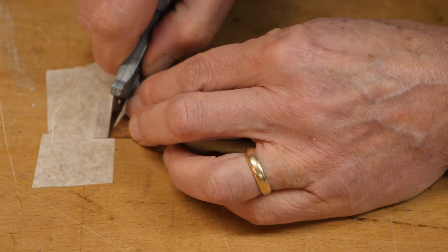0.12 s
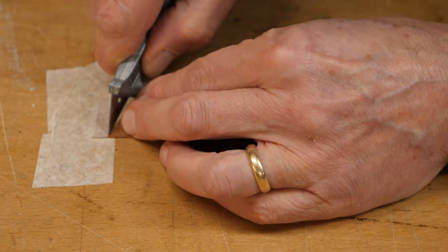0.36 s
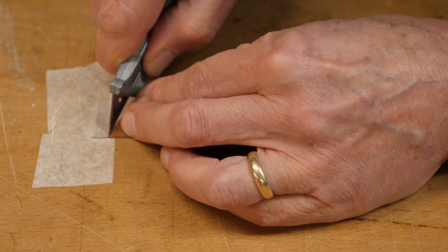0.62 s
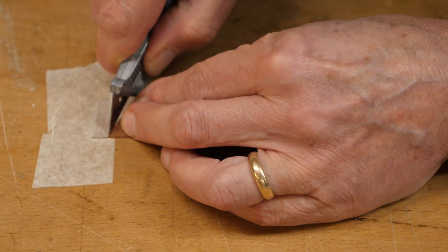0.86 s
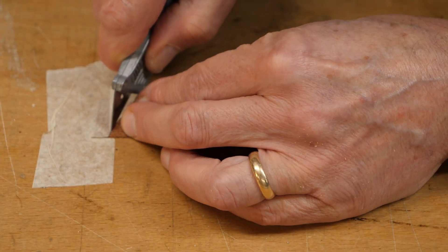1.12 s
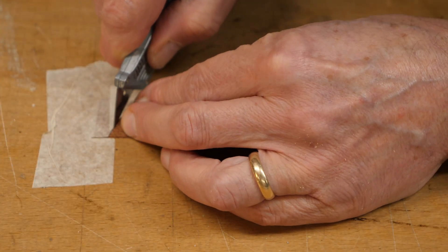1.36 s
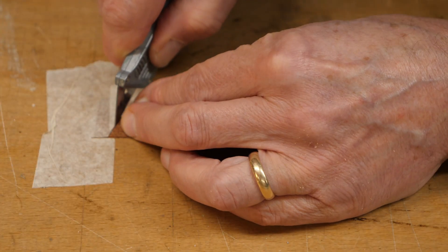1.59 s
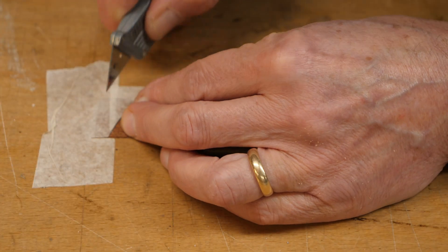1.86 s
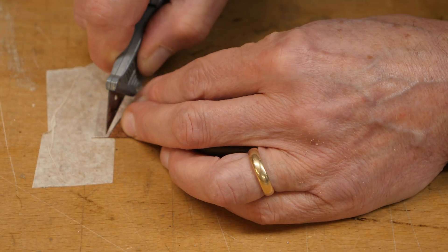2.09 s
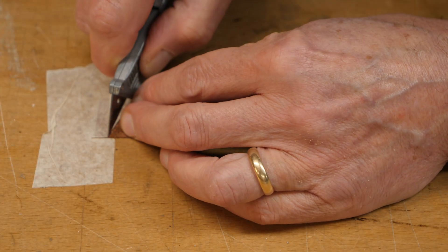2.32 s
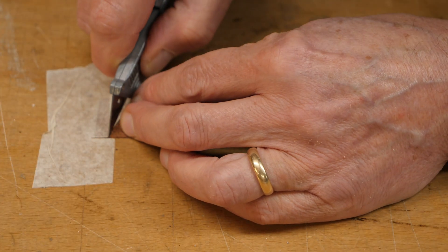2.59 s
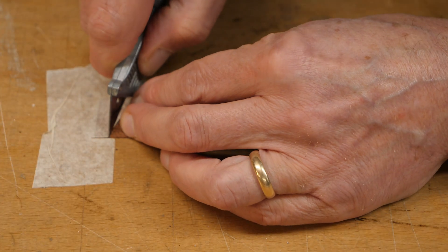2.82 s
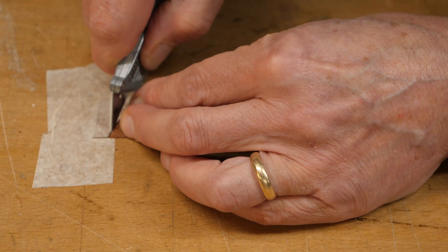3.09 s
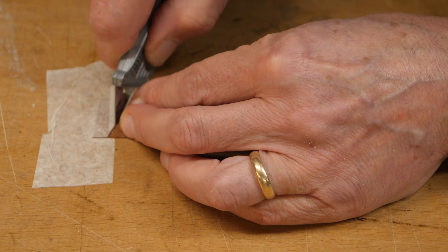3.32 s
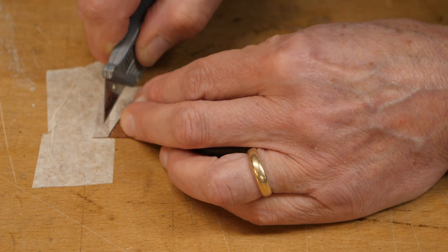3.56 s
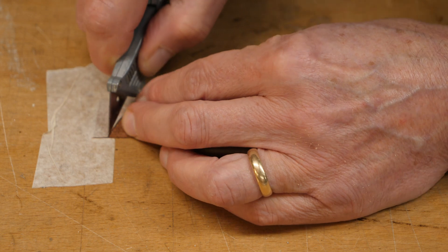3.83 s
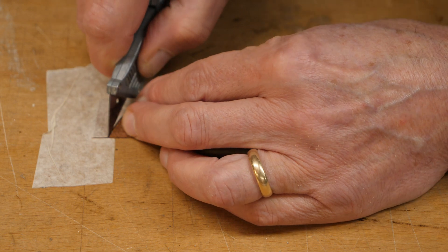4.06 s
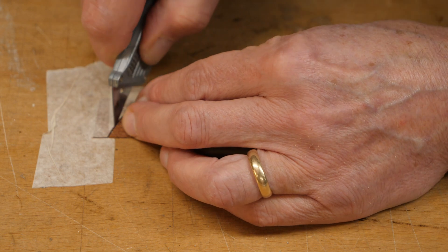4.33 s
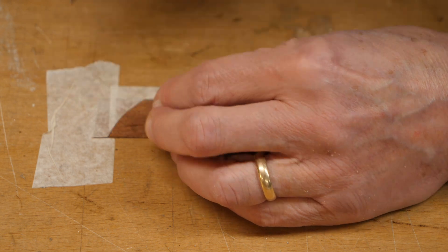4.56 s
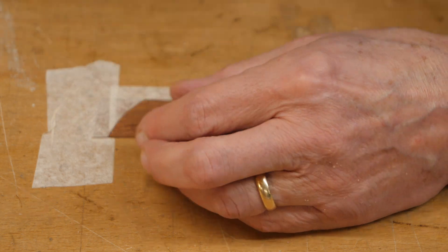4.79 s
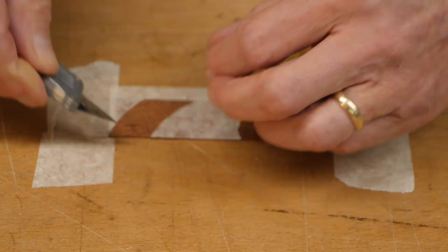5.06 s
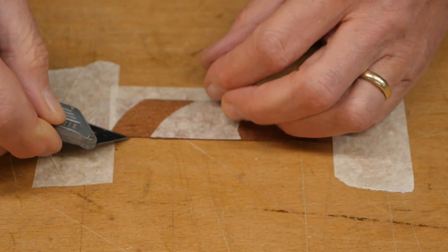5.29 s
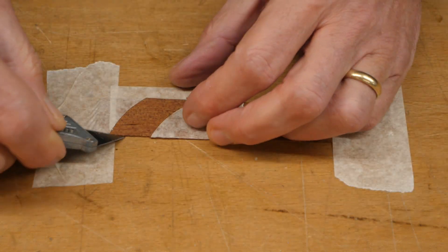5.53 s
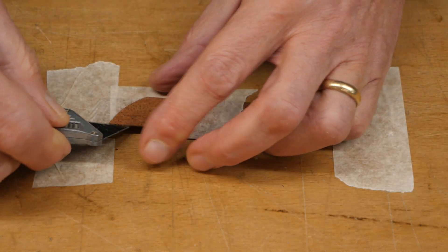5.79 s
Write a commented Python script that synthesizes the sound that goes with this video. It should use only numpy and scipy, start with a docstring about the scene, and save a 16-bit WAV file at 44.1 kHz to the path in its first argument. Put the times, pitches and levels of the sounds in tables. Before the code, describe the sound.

Close up in a small quiet workshop, a knife works on thin veneer lying on a wooden bench. Faint taps come first, then a sharp crunching crack, a brief scrape and a papery slap. More cracks follow around three seconds, with a hard knock after four. The hand then shifts with soft thumps and crisp ticks, and skin and blade rub softly. Short room reflections, low rumble and light hiss; near-centred stereo microphone.

```python
"""A small quiet workshop: a craft knife works on thin veneer taped to a wooden bench, close by.
Fibres snap as clusters of tiny cracks; blows ring the natural tones of the veneer and the bench top.
Blade and skin scrape over the wood as clumpy, coloured noise.
The room answers every contact; air rumble and microphone hiss lie underneath."""
import sys
import numpy as np
from scipy import signal
from scipy.fft import rfft, irfft, next_fast_len
from scipy.io import wavfile
from scipy.ndimage import map_coordinates

SR = 44100
rng = np.random.default_rng(int(sys.argv[2]) if len(sys.argv) > 2 else 0)


def to_wav(s):
    """Save 16-bit WAV."""
    ch = np.atleast_2d(s).T  # columns
    pcm = np.round(np.clip(ch, -1, 1) * 32767)  # PCM
    wavfile.write(sys.argv[1], SR, pcm.astype(np.int16))


def boost_factor(decibels):
    """Convert a level in decibels to a linear amplitude factor."""
    exponent = np.asarray(decibels, float) / 20
    return 10 ** exponent


N = 260631  # length in samples
SILENT_DB = -120


def unit(x):
    """Scales a sound to rms 1."""
    return x / np.sqrt(np.mean(x ** 2) + 1e-20)


def along(points, hz):
    """Reads values between (f/Hz, value) points on a logarithmic pitch axis."""
    f, value = np.transpose(points)
    return np.interp(np.log(hz + 1), np.log(f + 1), value)


def coloured(x, spectrum):
    """Makes each frequency louder or softer, following (f/Hz, level/dB) points."""
    size = next_fast_len(len(x) + 2048)
    gain = boost_factor(along(spectrum, np.fft.rfftfreq(size, 1 / SR)))
    return irfft(rfft(x, size) * gain, size)[:len(x)]


def noise(count, colour):
    """Coloured random noise of rms 1."""
    return unit(coloured(rng.standard_normal(count), colour))


def wobble(rate):
    """A smooth random curve through `rate` random points a second."""
    points = rng.standard_normal(int(N * rate / SR) + 4)
    return map_coordinates(points, [np.arange(N) * rate / SR])


def add(total, s, sound):
    """Mixes a sound in at time s."""
    part = total[round(s * SR):][:len(sound)]
    part += sound[:len(part)]


def causal(spectrum, size):
    """A pulse of the given colour with its energy as early as possible (minimum phase); peak 1."""
    log_gain = np.log(boost_factor(along(spectrum, np.fft.rfftfreq(size, 1 / SR))))
    cepstrum = irfft(log_gain, size)
    cepstrum[1:size // 2] *= 2
    cepstrum[size // 2 + 1:] = 0
    pulse = irfft(np.exp(rfft(cepstrum)), size)
    return pulse / np.abs(pulse).max()


# the blade breaks through the fibres into the bench:
# t/s, snap level/dB, fizz level/dB, veneer level/dB, bench knock level/dB
CUT_BLOWS = [(1.3599, -7, -18.5, -26, -21), (2.7585, -17, -75, -22.5, -18), (3.101, -9, -16, -19.5, -16),
             (3.4103, -18, -27, -32.5, -31), (4.2473, -16, -33.5, -24, -14.5)]


def cuts():
    """Blows of the breaking blade: all layers, with a thump tied to the knock."""
    return [(s, snap, fizz, veneer, knock, knock - 25.5, 0) for s, snap, fizz, veneer, knock in CUT_BLOWS]


# the tip comes down hard on the loose veneer: t/s, veneer level/dB, bench knock level/dB
SLAP_BLOWS = [(1.935, -9.5, -34.5), (3.5463, -9.5, -24.5)]


def slaps():
    """Blows on loose veneer: its ringing sets the level of snap, fizz and thump."""
    return [(s, veneer - 2.5, veneer - 42, veneer, knock, veneer - 48, 0) for s, veneer, knock in SLAP_BLOWS]


# fingers and handle tap the bench: t/s, bench knock level/dB, veneer level/dB, bench thump level/dB
TAP_BLOWS = [(0.1034, -34.5, -42, -49), (0.421, -51, -54, -59), (0.7235, -41, -52, -48),
             (0.9592, -38, -50, -45.5), (2.0867, -33, -35, -49), (2.717, -39, -42, -48),
             (2.8105, -32.5, -64, -64), (2.901, -31, -38, -58), (2.989, -33, -42.5, -58),
             (3.7889, -73, -47.5, -70), (4.0548, -40, -45, -53), (4.4767, -22.5, -33.5, -50),
             (4.867, -46, -58, -55)]


def taps():
    """Padded blows: knock, veneer and thump, a weak snap and no fizz."""
    return [(s, veneer - 9.5, SILENT_DB, veneer, knock, thump, 0) for s, knock, veneer, thump in TAP_BLOWS]


# the heel of the hand lands: t/s, thump level/dB, knock level/dB, hardness/dB per octave
HEEL_BLOWS = [(4.581, -21.5, -38, 8), (5.212, -27.5, -33.5, -4)]


def heels():
    """Heavy blows: a positive hardness strengthens the upper tones of the thump."""
    return [(s, knock - 2, SILENT_DB, knock - 9, knock, thump, hard) for s, thump, knock, hard in HEEL_BLOWS]


# single fibres or tape letting go: t/s, snap level/dB, fizz level/dB
TICK_BREAKS = [(1.1721, -40.5, -56.5), (1.269, -46, -54), (2.1175, -65, -47), (3.1907, -31.5, -42),
               (3.4206, -43, -35.5), (3.9674, -48, -51.5), (4.516, -31, -27), (4.591, -43, -63),
               (4.7759, -19.5, -24.5), (4.8104, -14, -22), (4.942, -25, -32), (5.7303, -56, -52)]


def ticks():
    """Light breaks: snap and fizz only."""
    return [(s, snap, fizz, SILENT_DB, SILENT_DB, SILENT_DB, 0) for s, snap, fizz in TICK_BREAKS]


def burst(spectrum, t, t60, splinter_db):
    """One clean break followed by a spray of splinters dying in t60; rms 1 over the first 4 ms."""
    breaks = boost_factor(splinter_db - 60 * t / t60) * rng.standard_normal(len(t))
    breaks[0] = 1
    crack = signal.fftconvolve(breaks, causal(spectrum, size=1024))[:len(t)]
    return crack / np.std(crack[:SR // 250])


# colour of breaking fibres: f/Hz, level/dB per Hz
SNAP_COLOUR = [(900, -50), (1500, -9.5), (2400, -10.5), (2900, -0.5), (3200, 6), (3700, -5.5),
               (4500, -10.5), (6500, -23), (9000, -37)]


def snap(t):
    """Fibres break: a crack and a spray of splinters."""
    return burst(SNAP_COLOUR, t, t60=0.018, splinter_db=-7.5)


# colour of fine, bright breaks and grit: f/Hz, level/dB per Hz
FIZZ_COLOUR = [(1500, -109), (4000, -18.5), (5500, 4.5), (9000, 2), (13000, -1.5), (15000, -2),
               (16000, -23), (17000, -32.5)]


def fizz(t):
    """The finest splinters: a brighter, shorter burst."""
    return burst(FIZZ_COLOUR, t, t60=0.0065, splinter_db=0.5)


def ringing(modes, t, spread_db, attack, dull_db=0):
    """One blow on fading tones, each at a new strength and slightly new pitch; rms 1 over 20 ms."""
    hz, db, t60 = np.transpose(modes)[:, :, None]
    strength, shift = rng.standard_normal((2, *db.shape))
    octaves = np.log2(hz / hz[0])
    size = boost_factor(db - dull_db * octaves + spread_db * strength - 60 * t / t60)
    tones = size * np.sin(2 * np.pi * hz * (1 + 0.015 * shift) * t)
    ring = np.sum(tones, axis=0) * (1 - np.exp(-t / attack))
    return ring / np.std(ring[:SR // 50])


# natural tones of the veneer: f/Hz, level/dB, t60/s (time to fade by 60 dB)
VENEER_TONES = [(427.5, -2.5, 0.057), (582.4, 1.5, 0.067), (625.5, 0, 0.02), (743, 0.5, 0.02),
                (869, -5, 0.052), (941, -2.5, 0.027), (1016, -1, 0.023), (1111, -3, 0.024),
                (1273, -7.5, 0.04), (1393, -11, 0.0457), (1960, 4, 0.011)]


def veneer_ring(t, soft):
    """The thin sheet rings; a softer blow starts it more slowly and with duller tones."""
    return ringing(VENEER_TONES, t, 2.5, 0.00082 + .00005 * soft, dull_db=0.41 * soft)


# middle tones of the bench top: f/Hz, level/dB, t60/s
KNOCK_TONES = [(166, -0.5, 0.065), (214.3, 2, 0.11), (319.4, 16.5, 0.027), (355.6, 4, 0.04)]


def bench_knock(t):
    """The bench top rings in its middle tones, rising over about 2 ms."""
    return ringing(KNOCK_TONES, t, 3.1, .002)


# lowest tones of the bench top: f/Hz, level/dB, t60/s
THUMP_TONES = [(60.3, 0, 0.57), (118, -2, 0.12), (135.8, 11, 0.022), (185.2, -14, 0.016)]


def bench_thump(t, hard_db):
    """The heavy top gives way (minus sign), then swings on its legs."""
    return -ringing(THUMP_TONES, t, 0.4, 0.0028, dull_db=-hard_db)


# how fast the room's answer fades: f/Hz, t60/s
ROOM_FADE = [(150, 0.38), (600, 0.28), (1500, 0.23), (3200, 0.28), (7000, .2), (14000, 0.31)]
# colour of the room's answer: f/Hz, level/dB
ROOM_COLOUR = [(60, -32), (170, -0.5), (600, 2), (1500, 1), (2500, -0.5), (3200, -3), (4200, -3),
               (7000, -7.5), (14000, -21)]


def room(x, delay):
    """A new random tail of the room; each frequency dies at its own speed."""
    hz, t, grains = signal.stft(rng.standard_normal(SR // 2), SR, nperseg=256)
    t60 = along(ROOM_FADE, hz)[:, None]
    gain = boost_factor(along(ROOM_COLOUR, hz)[:, None] - 60 * t / t60)
    gain = gain * np.sqrt(6 * np.log(10) / t60 / SR)  # evens out the energy of long and short tails
    tail = signal.istft(grains * gain * (t > delay), SR, nperseg=256)[1]
    return signal.fftconvolve(x, tail)


def contacts():
    """Every contact mixes breaking fibres, veneer and bench, and wakes the room."""
    out = np.zeros(N)
    t = np.arange(SR // 2) / SR
    short = t[:SR // 10]
    rows = cuts() + slaps() + taps() + ticks() + heels()
    for s, snap_db, fizz_db, veneer_db, knock_db, thump_db, hard_db in rows:
        soft = max(knock_db - veneer_db + 10, 0)  # a blow that mostly knocks the bench is padded
        near = boost_factor(snap_db) * snap(short) + boost_factor(fizz_db) * fizz(short)
        near += boost_factor(veneer_db) * veneer_ring(short, soft)
        near += boost_factor(knock_db) * bench_knock(short)
        # turns the contact down about 5 dB, slightly more in the deep bass
        near = coloured(near, [(70, -7), (140, -5.0)])
        add(out, s, near)
        # only the quickly faded start of the blow feeds the room, for a smoother tail
        faded_start = near * boost_factor(-60 * short / .014)
        add(out, s, room(faded_start, delay=.006))
        add(out, s, boost_factor(thump_db) * bench_thump(t, hard_db))
    return out


def pressure(strokes, sag_db=0):
    """Strength of rasp, drone and hiss: each stroke swells, holds (sagging in dB/s) and lets go."""
    gains = np.zeros((3, N))
    t = np.arange(N) / SR
    for start, swell, hold, rasp_db, drone_db in strokes:
        after = np.maximum(t - start - swell - hold, 0)
        room_answer = boost_factor(-6.5) * np.exp(-after / 0.039)
        fade = np.maximum(np.exp(-after / 0.021), room_answer)
        sag = boost_factor(-sag_db * np.clip(t - start, 0, swell + hold))
        held = np.clip((t - start) / swell, 0, 1) ** 2 * fade * sag
        levels = boost_factor([rasp_db, drone_db, rasp_db - 16.5])[:, None]
        gains = np.hypot(gains, levels * held)
    return gains


# low drone of the rubbed bench: f/Hz, level/dB per Hz
DRONE_COLOUR = [(40, -26.5), (59, 15.5), (80, -16), (130, 1.5), (297, 1), (408, 0), (500, -3), (606, -0.5),
                (814, -13), (1000, -7), (1340, -13.5), (1900, -38)]


def friction(gains, rasp_colour, hiss_colour, slow_db, fast_db):
    """Stick and slip over the grain: the same clumping shapes rasp, bench drone and hiss."""
    clumps = boost_factor(slow_db * wobble(35) + fast_db * wobble(170))
    colours = (rasp_colour, DRONE_COLOUR, hiss_colour)
    grit = [unit(coloured(clumps * rng.standard_normal(N), colour)) for colour in colours]
    return np.sum(gains * grit, axis=0)


# fibres keep tearing behind a deep cut: start t/s, swell t/s, hold t/s, rasp level/dB, drone level/dB
TEAR_RUNS = [(1.358, 0.0033, 0.052, -30.5, -33.5), (3.099, 0.0035, 0.073, -30, -32)]
# colour of tearing fibres: f/Hz, level/dB per Hz
TEAR_COLOUR = [(500, -35), (800, -2), (1500, 3), (2400, -4), (3200, -1), (4300, -17), (6500, -22.5),
               (9000, -30.5), (15400, -120)]


def tearing():
    """Cut fibres crunch; the tearing thins out by 89 dB a second as it runs."""
    return friction(pressure(TEAR_RUNS, sag_db=89), TEAR_COLOUR, FIZZ_COLOUR, slow_db=-1.0, fast_db=1.5)


# the edge strokes across the grain: start t/s, swell t/s, hold t/s, rasp level/dB, drone level/dB
EDGE_STROKES = [(0.311, 0.017, 0.075, -55.5, -62), (1.184, 0.0084, .03, -51.5, -51),
                (1.272, 0.013, 0.05, -48.5, -76.5), (1.53, 0.0039, 0.011, -59, -62),
                (1.659, 0.014, 0.03, -45.5, -53), (1.686, 0.027, 0.048, -29, -31),
                (2.268, 0.014, 0.057, -51, -77), (2.875, 0.0059, 0.014, -53, -56),
                (3.291, 0.011, 0.046, -49.5, -56), (3.343, 0.034, 0.041, -39, -34.5),
                (4.37, 0.0075, .02, -48.5, -45.5), (4.4, .01, .025, -48, -42),
                (5.08, 0.0069, 0.02, -48, -79), (5.138, 0.0052, 0.013, -46.5, -46.5),
                (5.764, 0.019, .03, -53.5, -48.5)]
# colour of the edge on the grain: f/Hz, level/dB per Hz
EDGE_COLOUR = [(590, -12), (1000, -5.5), (1680, -23), (1740, -18.5), (1970, -10.5), (2470, -9.5),
               (2720, -11), (3100, 0.5), (3650, -14), (4260, -9), (4770, -25.5), (7000, -25), (9100, -51.5),
               (15400, -120)]


def edge_strokes():
    """The steel edge chatters over the grain."""
    return friction(pressure(EDGE_STROKES), EDGE_COLOUR, FIZZ_COLOUR, slow_db=1.05, fast_db=2)


# the blade is pushed flat under the veneer:
# start t/s, swell t/s, hold t/s, rasp level/dB, drone level/dB
FLAT_PUSHES = [(5.215, 0.12, 0.265, -47, -67)]
# colour of the flat of the blade: f/Hz, level/dB per Hz
FLAT_COLOUR = [(900, -38), (1250, -4), (1600, -15), (2000, -13), (2300, 8), (2700, -8), (3300, -6),
               (4000, -18), (6000, -39)]
# colour of skin on tape: f/Hz, level/dB per Hz
RUSTLE_COLOUR = [(2500, -53), (4000, 0), (5500, -1), (8000, -4), (11000, -3.5), (15000, -10), (16500, -34)]


def flat_pushes():
    """The flat of the blade sings under the veneer."""
    return friction(pressure(FLAT_PUSHES), FLAT_COLOUR, RUSTLE_COLOUR, slow_db=-3.5, fast_db=1.0)


# short dry scuffs, faint knocks and bright ticks: middle t/s, level/dB, length t/s,
# fizz level/dB and drone level/dB, both over the rasp
SMALL_NOISES = [(.058, -51, 0.0052, -27, 0), (0.095, -41.5, 0.0054, -21.5, 3.5),
                (0.185, -15.5, 0.0037, -8.5, -7.5), (0.254, -54, 0.0083, -13.5, -8.5),
                (1.36, -33, 0.0027, -20, 4), (1.714, -34.5, 0.0021, -13, -1), (1.765, -31, 0.0041, -24, 7),
                (1.798, -36, .002, -13, -3), (3.096, -43.5, 0.0018, -25, 12),
                (3.343, -57.5, 0.00436, -22, 19.5), (3.373, -34.5, 0.0023, -28, 4),
                (3.528, -35, 0.0012, -11, 4), (4.209, -46.5, 0.0014, -18.5, 16.5),
                (4.24, -44, 0.0084, -18, 9), (4.483, -36.5, 0.0079, -16, 7),
                (4.517, -29.5, 0.0041, -4, -1.5), (5.373, -42.5, 0.0032, -5, 5.5),
                (5.399, -39, 0.0051, -19, -2), (5.673, -59, .004, 15.5, -10),
                (5.695, -43.5, 0.0029, -3.5, -10), (5.849, -52, 0.0041, 8, -11)]
# colour of the rasp in these noises: f/Hz, level/dB per Hz
SCUFF_COLOUR = [(710, -23.5), (1200, -5.5), (2870, -1.5), (3150, 3.5), (3520, -10.5), (3710, -4.5),
                (5370, -9), (7000, -21), (9100, -38.5), (15400, -120)]


def small_noises():
    """Short dry scuffs, faint knocks and bright ticks: noise a few milliseconds long, without room."""
    out = np.zeros(N)
    t = np.arange(-2048, 2048) / SR
    for s, db, length, fizz_db, drone_db in SMALL_NOISES:
        grit = noise(len(t), SCUFF_COLOUR)
        grit += boost_factor(fizz_db) * noise(len(t), FIZZ_COLOUR)
        grit += boost_factor(drone_db) * noise(len(t), DRONE_COLOUR)
        add(out, s + t[0], boost_factor(db) * grit * np.exp(-np.abs(t) / length))
    return out


# hands rest and press, then slide over veneer and tape: t/s, rasp level/dB, hiss level/dB
HAND_LEVELS = [(0, -72, -92.5), (.3, -70.5, -81), (.5, -65, -70.5), (1.1, -59, -73), (2.5, -63.5, -70),
               (4.18, -64.5, -70.5), (4.27, -52, -72), (4.4, -50.5, -60.5), (4.48, -50.5, -59),
               (4.66, -49, -67), (4.82, -51, -57.5), (5.02, -56.5, -59.5), (5.13, -48.5, -58.5),
               (5.25, -48, -68.5), (5.44, -39.5, -62.5), (5.54, -34.5, -53.5), (5.585, -41.5, -55),
               (5.63, -50, -63), (5.76, -54, -59.5), (5.91, -53.5, -55)]
# colour of skin on wood: f/Hz, level/dB per Hz
RASP_COLOUR = [(590, -10), (1000, -6.5), (1280, -7), (1450, -8.5), (1580, -8.5), (1930, -7), (2170, -6.5),
               (2610, -6.5), (3260, -4), (4160, -15), (4580, -15.5), (5390, -20.5), (7000, -22),
               (9100, -25), (15400, -120)]


def hands():
    """Skin rubs softly; the bench drone follows the rasp, and the hiss flickers."""
    s, *levels = np.transpose(HAND_LEVELS)
    rasp_db, hiss_db = [np.interp(np.arange(N) / SR, s, db) for db in levels]
    rest_db, rest_drone_db = -60, -57.5  # rasp and drone under a resting hand
    drone_db = rest_drone_db + 0.55 * (rasp_db - rest_db) + 0.81 * wobble(5.1)
    hiss_db = hiss_db + 2 * wobble(11) + 2.1 * wobble(70)
    return friction(boost_factor([rasp_db, drone_db, hiss_db]), RASP_COLOUR, RUSTLE_COLOUR, slow_db=1.7, fast_db=1.0)


# colour of the quiet workshop: f/Hz, level/dB per Hz
AIR_COLOUR = [(15, -21), (30, 0.5), (97, -4.5), (167, -4.5), (214, -4.5), (304, -19), (389, -27.5),
              (1730, -21), (2270, -59.5), (3150, -19), (4480, -43), (14800, -34), (16500, -63)]


def air():
    """The quiet workshop: steady hiss, with a rumble that comes and goes."""
    still = noise(N, AIR_COLOUR)
    swell = boost_factor(2 * wobble(5)) - 1
    rumble = coloured(still * swell, [(400, -7), (1500, -35)])
    return boost_factor(-57) * (still + rumble)


# colour of the microphone's own hiss: f/Hz, level/dB per Hz
MICROPHONE_COLOUR = [(24, -39), (40, -22), (222, -7.5), (386, -10), (485, -10), (1030, -12.5), (14900, -13),
                     (16500, -4)]


def microphone_difference(dry):
    """What differs left to right: hiss, and a faint, mostly treble quarter-cycle-shifted copy."""
    hiss = boost_factor(-62.5) * noise(N, MICROPHONE_COLOUR)
    shifted = signal.hilbert(dry[0], next_fast_len(N)).imag[:N]
    return hiss + coloured(shifted, [(200, -38), (2000, -30), (3600, -29), (5500, -19), (14000, -16.5)])


# the level dips briefly: middle t/s, half-length t/s, depth level/dB
LEVEL_DIP = (.316, .004, -22)


def dip():
    """Gain curve of one brief dip in level."""
    s, length, db = LEVEL_DIP
    return boost_factor(db * np.exp(-((np.arange(N) / SR - s) / length) ** 4))


def scene():
    """All sources sit straight ahead; the microphone loses the deepest bass."""
    middle = contacts() + tearing() + edge_strokes() + flat_pushes() + small_noises() + hands() + air()
    low_cut = signal.butter(2, 43.5, "high", fs=SR, output="sos")  # Hz
    middle = signal.sosfilt(low_cut, middle)
    return np.array([middle, middle])


def top_cut(x):
    """Nothing passes above the cut-off."""
    return signal.sosfilt(signal.butter(12, 15300, fs=SR, output="sos"), x)


def record(dry):
    """Two close microphone openings hear nearly the same sound; the highest peaks are rounded off."""
    side = microphone_difference(dry)
    ports = dip() * (dry + [side, -side])
    mix = ports / (1 + np.abs(ports / .95) ** 6) ** (1 / 6)  # the input stage rounds off peaks
    return top_cut(mix)


dry = scene()
out = record(dry)
to_wav(out)
```